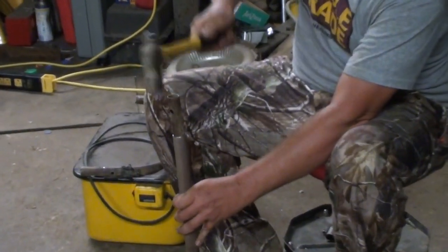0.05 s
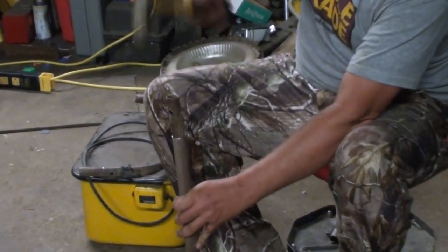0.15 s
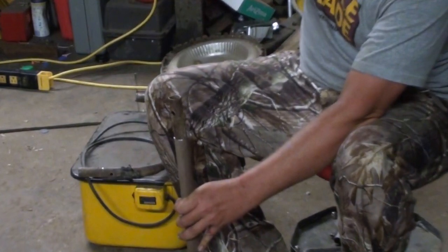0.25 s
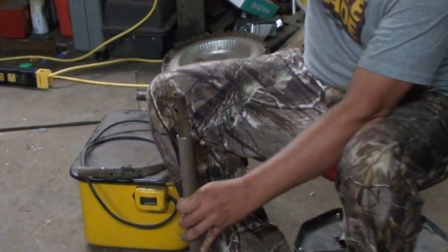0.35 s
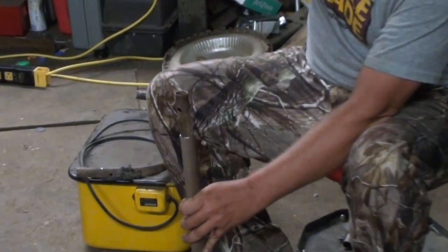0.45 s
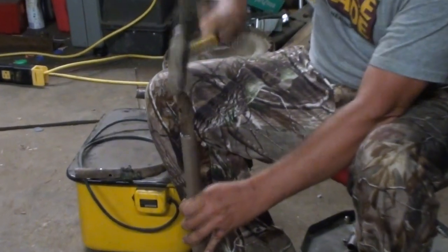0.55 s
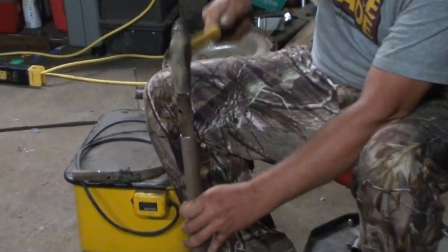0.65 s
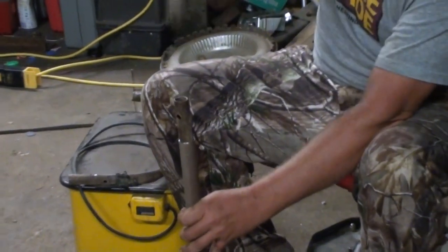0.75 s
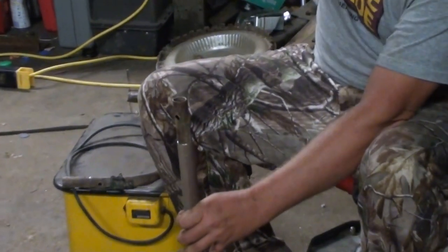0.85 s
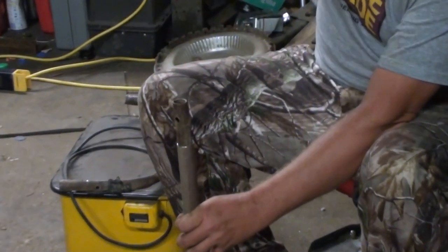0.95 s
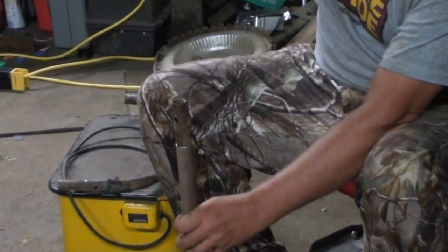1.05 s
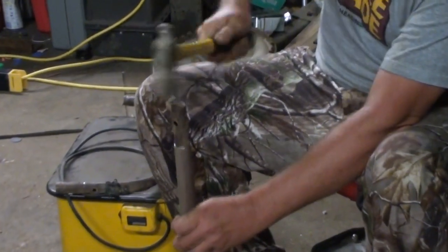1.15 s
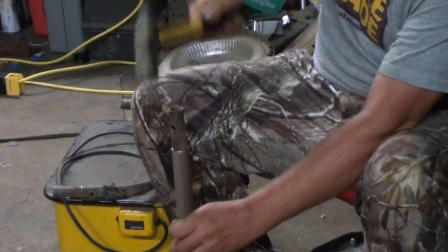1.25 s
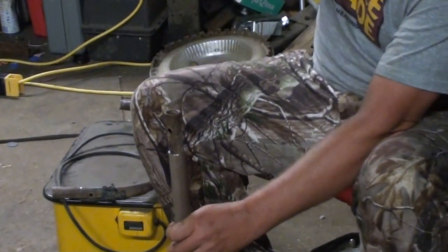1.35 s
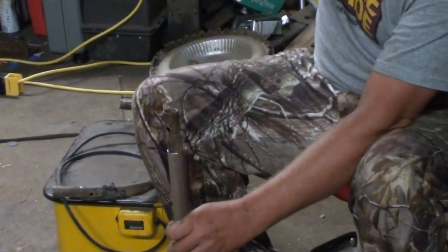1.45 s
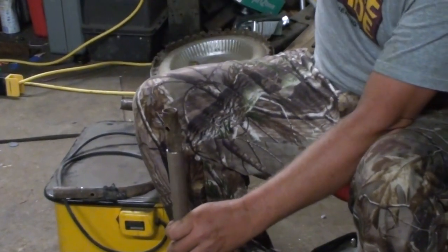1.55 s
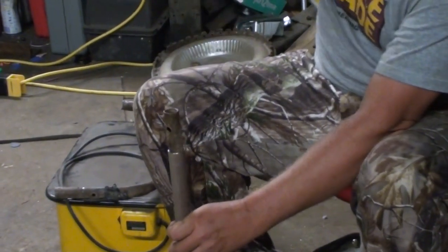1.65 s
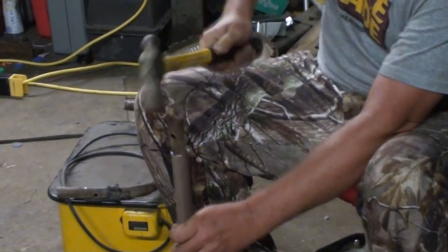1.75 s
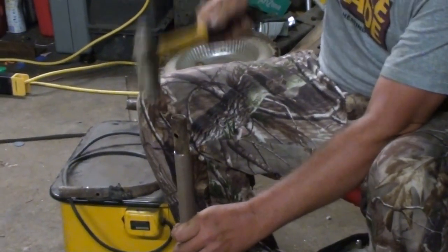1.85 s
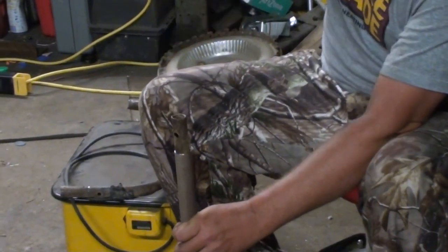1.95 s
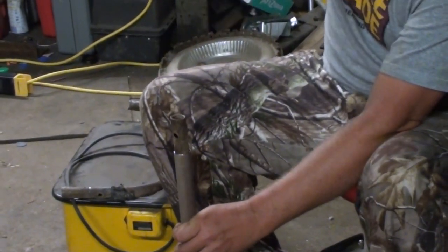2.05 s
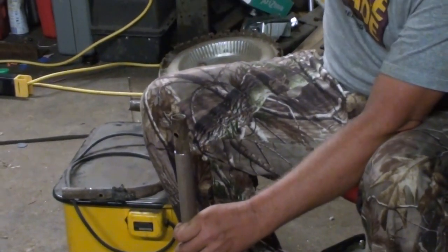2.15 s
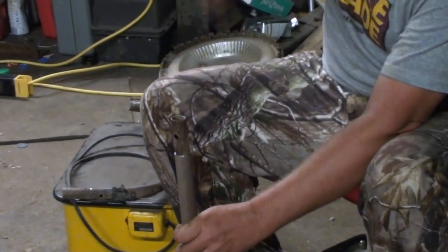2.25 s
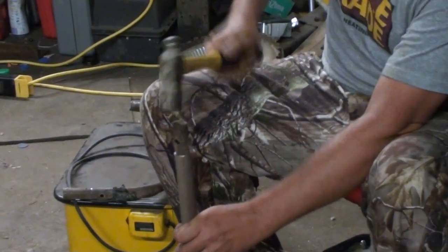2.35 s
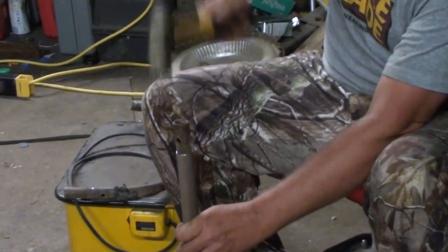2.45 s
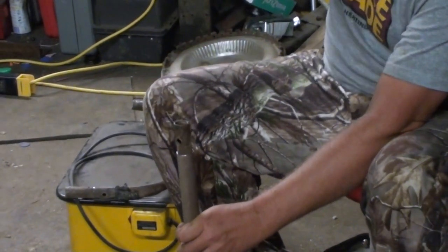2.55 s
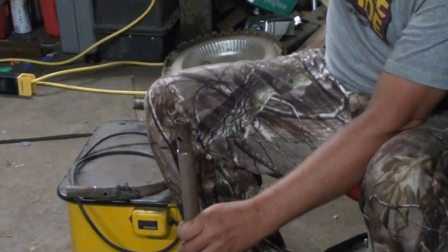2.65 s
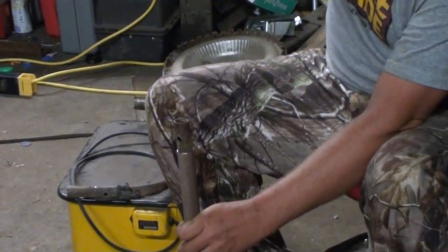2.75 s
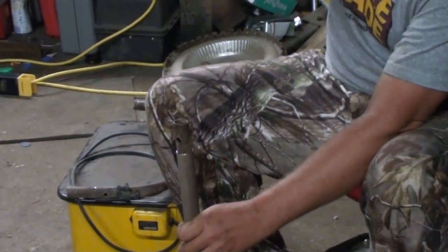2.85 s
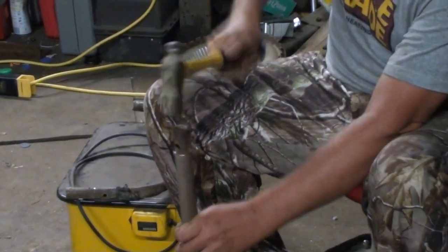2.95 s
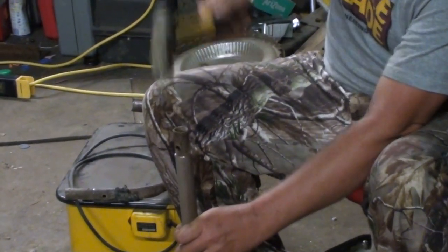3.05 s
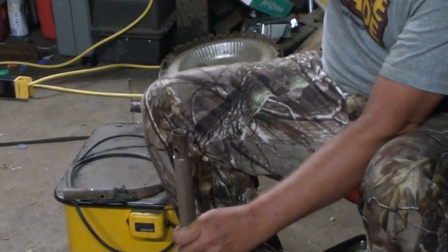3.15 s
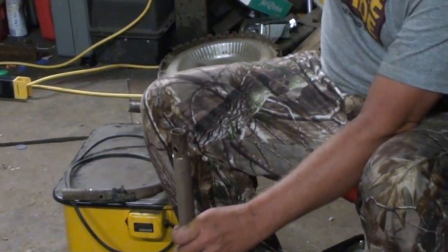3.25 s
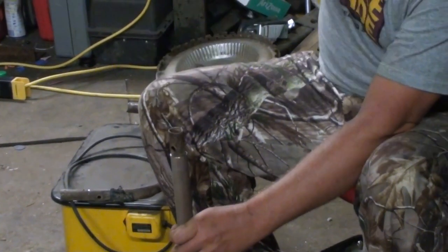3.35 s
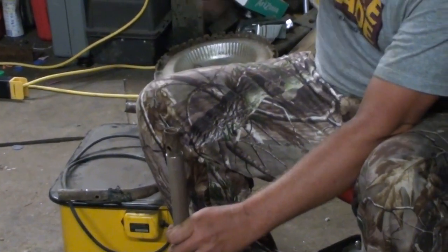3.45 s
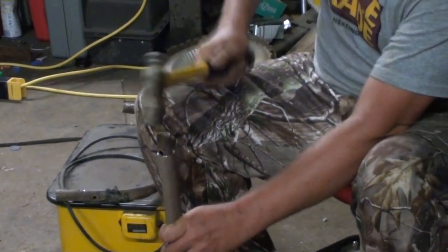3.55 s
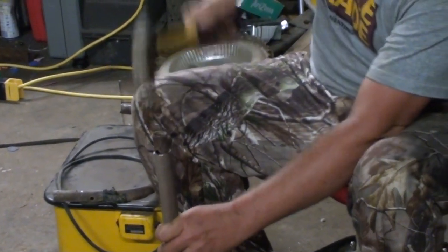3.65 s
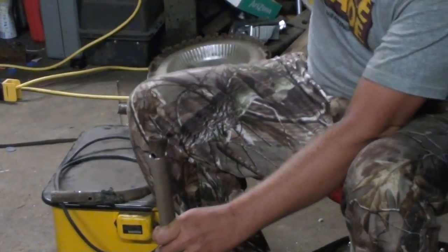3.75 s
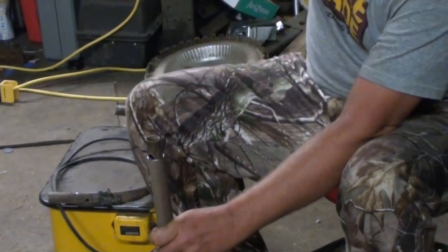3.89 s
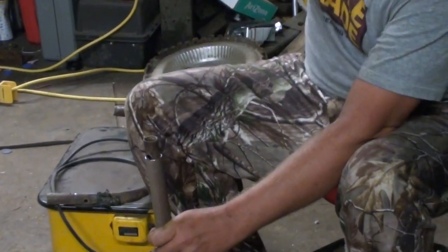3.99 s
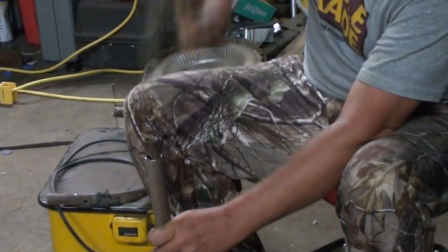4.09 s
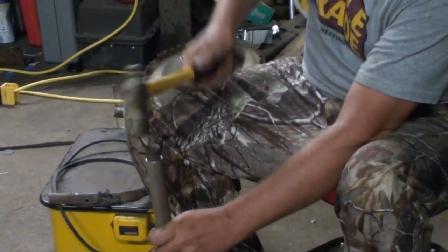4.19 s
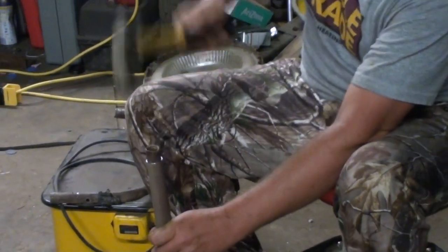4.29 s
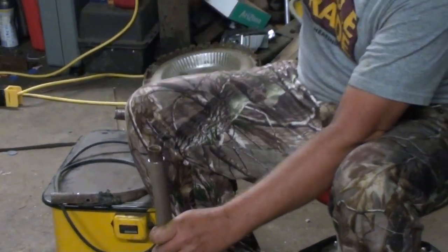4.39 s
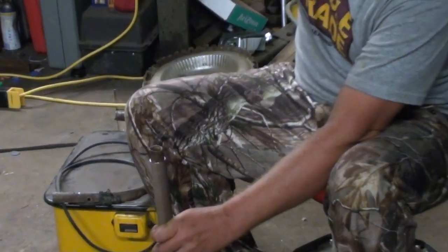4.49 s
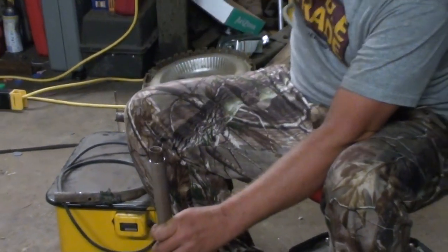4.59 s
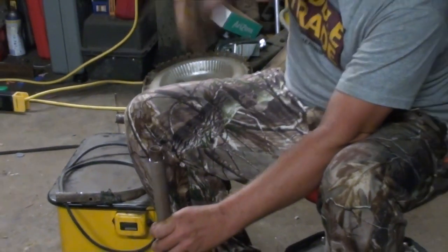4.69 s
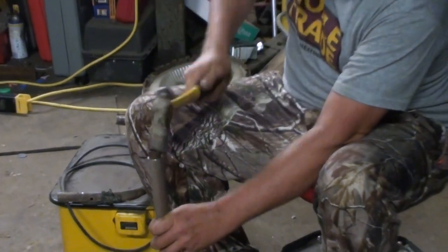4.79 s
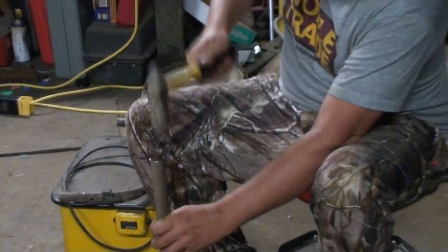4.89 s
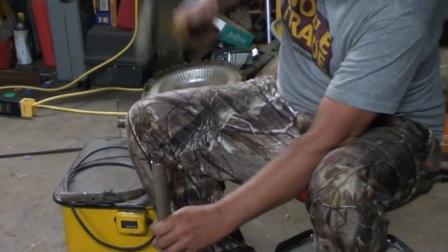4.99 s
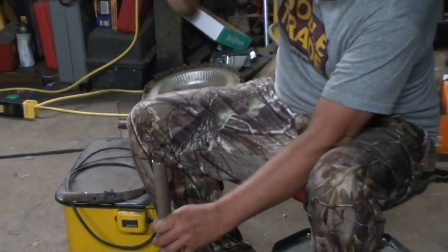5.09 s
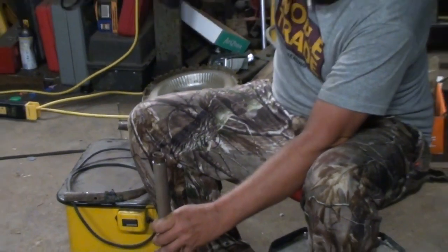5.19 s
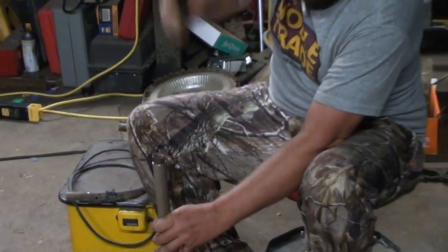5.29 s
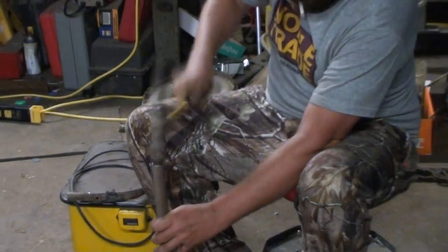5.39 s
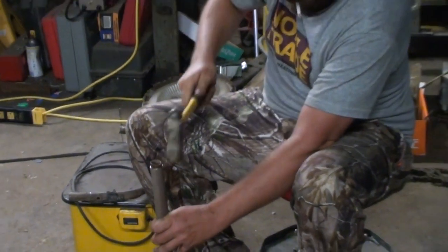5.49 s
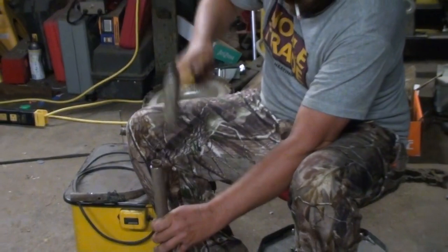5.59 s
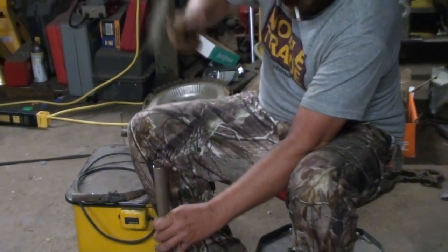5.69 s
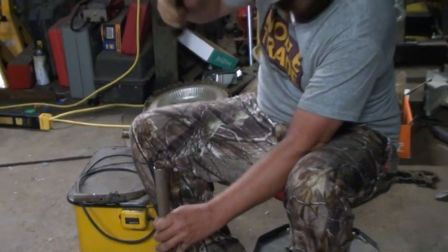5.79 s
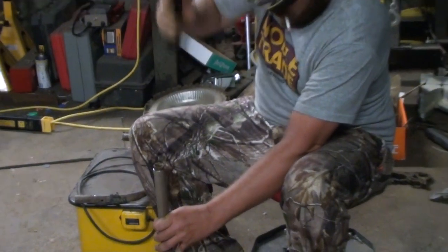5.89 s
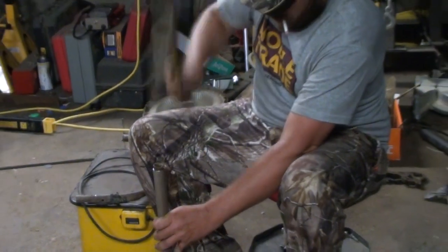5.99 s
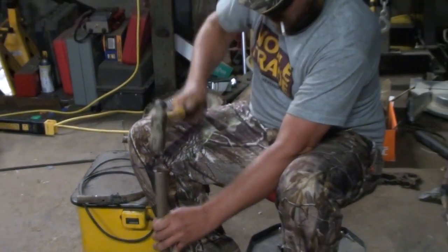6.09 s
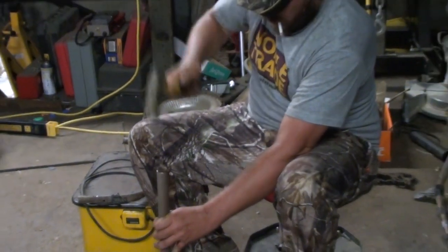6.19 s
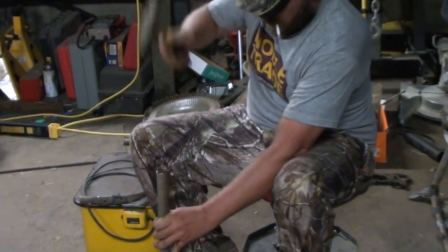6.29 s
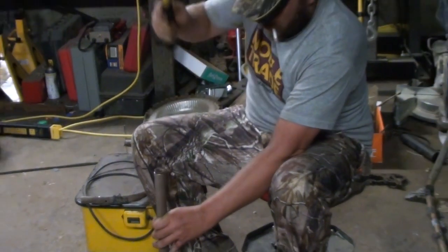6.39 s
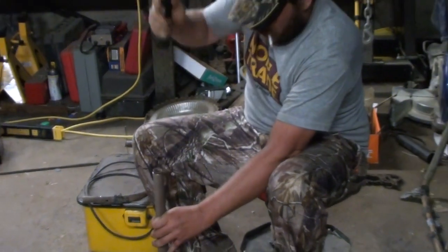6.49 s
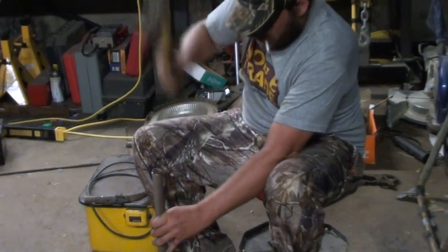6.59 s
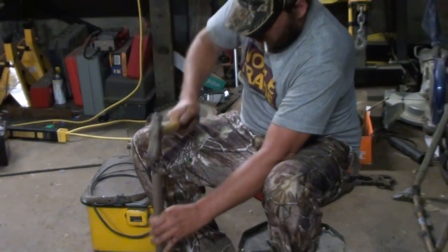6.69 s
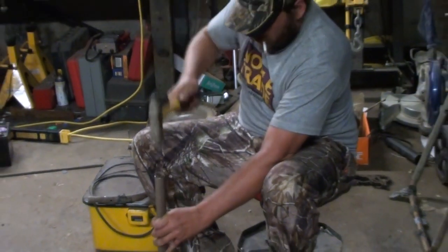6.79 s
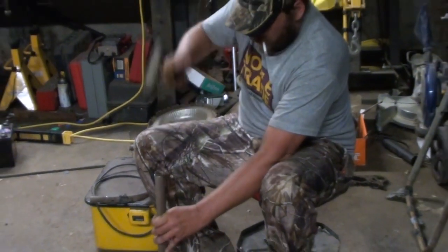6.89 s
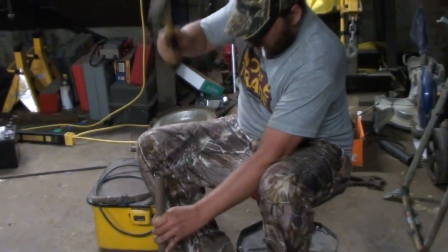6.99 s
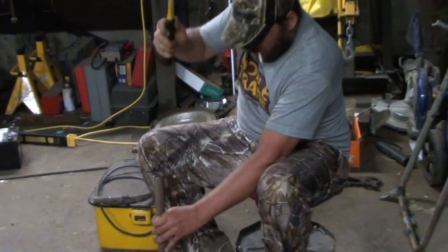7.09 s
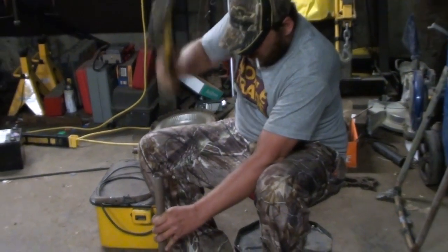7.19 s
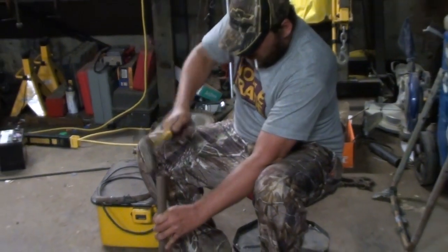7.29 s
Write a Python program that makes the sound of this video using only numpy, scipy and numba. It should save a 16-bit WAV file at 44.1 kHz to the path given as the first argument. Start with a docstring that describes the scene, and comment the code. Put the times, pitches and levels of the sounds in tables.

```python
"""Hard, short clanks come first: a hammer strikes a hand-held upright steel tube at a steady pace in a garage.
Each blow is a dense burst of resonances with rebounds a millisecond or two apart and a few thin modes ringing on;
the spot struck shifts its colour. Echoes and a stereo tail of about a second make the hard-walled room.
At the camera microphone, shaped noise gives handling rumble and still air, and wavering sines a faint hum.
A limiter flattens the start of each blow and its tail, then peaks are rounded and the top is cut."""
import sys
import numpy as np
from scipy import signal
from scipy.fft import rfft, irfft
from scipy.io import wavfile
from numba import njit

SR = 44100
rng = np.random.default_rng(int(sys.argv[2]) if len(sys.argv) > 2 else 0)


def digitize_waveform(pressure):
    """Quantize a signal to 16-bit integers and store it at the path in sys.argv[1].

    Rows of a 2-D input are taken as channels; values are limited to [-1, 1].
    """
    field = np.atleast_2d(pressure).T
    bounded = np.clip(field, -1, 1)
    quanta = np.round(bounded * 32767).astype(np.int16)
    wavfile.write(sys.argv[1], SR, quanta)


N = 323587

# blows on the tube; the spot struck favours two of its resonances (the first blow falls before the start):
# [t/s, relative force level/dB, brightness/(dB per octave), rebound delay/ms, rebound share/(0-1),
#  lower resonance f/Hz, upper resonance f/Hz, lift level of both/dB, thud lift level/dB,
#  lasting ring level re the crack/dB]
BLOWS = [ (-.53, 1.5, .7, 1.2, .2, 2300, 6400, 5, 2, -28),
         (0.066, 1, 0.35, 0.9, 0.23, 1900, 3160, 5.5, -5, -30),
         (.648, 1.65, 0, 0.94, 0.1, 2420, 3430, 5.5, -8.5, -20),
         (1.2219, -2, .5, 1.73, 0.22, 1850, 5930, 3.5, 2.5, -41),
         (1.814, -0.4, 0.45, 1.73, 0.13, 2800, 6980, 7, -0.5, -35),
         (2.4068, 0.1, .4, 0.51, 0.25, 5774, 7500, 3, -2, -27),
         (3.0062, 2.34, .5, 1.4, 0.2, 1530, 6860, 1.5, -5, -29),
         (3.6126, 2, 0.06, 2.17, 0.33, 3310, 9100, 5.5, -8, -42),
         (4.2134, -2, 1.44, 1.18, 0.2, 790, 7700, 5, 8, -29),
         (4.8458, 0, -0.94, 1.17, 0.34, 1000, 5070, 1.5, -7.5, -39),
         (5.4959, 1.4, -.2, 1.39, .3, 780, 2000, 3.5, -2, -14),
         (6.1328, 1.5, 0.43, 1.13, 0.3, 2000, 2820, 5, 7.5, -36),
         (6.7641, 0.5, -1.14, 1.31, 0.14, 980, 2510, 5.5, 4.5, -40)]
# colour of the clank common to all blows: [f/Hz, level/dB]
CLANK_COLOUR = [(30, -35), (60, -43), (140, -12), (300, -11.5), (440, -9.5), (590, -19), (950, -7),
                (1250, -4.5), (1800, -1.5), (2600, -2.5), (3800, -5), (6500, -0.5), (8800, -7),
                (10800, -18.5), (15500, -28)]
# thin lasting modes of the tube, mostly one close cluster: [f/Hz, relative level/dB, t60/s]
TUBE_MODES = [(4322, -3, .6), (4389, 0, .95), (4425, -1, .75), (4490, -3, .6), (5262, -4, .5)]
# reverberation time of the garage: [f/Hz, t60/s]
GARAGE_T60 = [(200, 0.64), (530, 0.89), (1400, 1.025), (2600, 1.06), (4000, 0.97), (6500, 0.84),
              (9700, 0.58), (14000, 0.29)]
# stereo width of the reverberation: [f/Hz, side minus mid level/dB]
TAIL_WIDTH = [(150, -48), (600, -19.5), (1400, -16), (2800, -13), (5600, -10), (9000, -13.5), (12000, -89)]
# first echoes off floor, bench and walls: [delay t/s, level re the direct sound/dB]
ECHOES = [(.0032, -5), (0.0186, -2), (.0205, -28), (0.026, -1.5)]
# rumble colour of the camera body: [f/Hz, relative level/dB]
RUMBLE_COLOUR = [(20, -28), (38, -14), (60, -1.5), (130, 2), (190, -4.5), (280, -6.5), (500, -24),
                 (1500, -61)]
# stereo width of the rumble: [f/Hz, side minus mid level/dB]
RUMBLE_WIDTH = [(30, -25), (130, -7)]
# shifts of the hand on the camera, short bumps to longer rubs, before the handling trim:
# [peak t/s, level/dB, dying time constant t/s]
GRIP_SHIFTS = [(0, -40, 0.032), (.545, -40, 0.029), (2.885, -34, 0.029), (2.955, -36.5, 0.014),
               (3.31, -40, 0.073), (3.788, -34, 0.15), (4.12, -52, 0.037), (4.43, -35, .1),
               (4.783, -29, 0.021), (5.345, -40, 0.033), (5.47, -48, 0.067), (5.82, -41, 0.037),
               (6.26, -34, 0.087)]
# tremor of the hand, firmer once the camera starts to move, before the handling trim: [t/s, level/dB]
TREMOR = [(2.2, -78), (2.7, -47), (5.6, -52.5), (7.3, -52)]
# colour of the still air in the garage: [f/Hz, relative level/dB]
AIR_COLOUR = [(25, -28), (120, -6), (240, 0), (450, 1), (600, -5.5), (1000, 1), (3000, -11), (7000, -27),
              (11000, -27), (15500, -32)]
# faint hum of a machine, about which each level wavers: [f/Hz, rms level/dB]
HUM = [(120, -68.5), (225, -61), (403.5, -68), (846, -64.5)]

TIME = np.arange(N) / SR  # s
REBOUND_HZ = 5370  # a rebound is a softer contact, dull above this
THUD_HZ, THUD_WIDTH_HZ = 193, 165  # the floor under the tube answers with a thud
GRIP_RISE = 0.57  # rise time of a grip shift as a share of its dying time
TOP_HZ = 16000  # upper limit of the sound after the limiter


def undb(db):
    """Turn a level in dB into an amplitude factor."""
    return 10 ** (np.asarray(db) / 20)


def unit(x):
    """Scale to an rms of one."""
    return x / np.sqrt(np.mean(x ** 2))


def lookup(points, hz):
    """Join (f/Hz, value) points by straight lines on a log-frequency axis."""
    f, value = np.transpose(points)
    return np.interp(np.log(np.maximum(hz, 1)), np.log(f), value)


def bins(size):
    """Frequencies in Hz of the spectrum of a sound of this many samples."""
    return np.fft.rfftfreq(size, 1 / SR)


def noise(colour):
    """Noise of unit rms whose spectrum follows (f/Hz, level/dB) points."""
    spectrum = rfft(rng.standard_normal(N))
    return unit(irfft(spectrum * undb(lookup(colour, bins(N))), N))


def wander(size, step):
    """A random line joining normal draws of spread one, one every step points."""
    knots = rng.standard_normal(size // step + 2)
    return np.interp(np.arange(size) / step, np.arange(len(knots)), knots)


def causal(db):
    """Spectrum of the promptest (minimum-phase) response with this gain curve."""
    cepstrum = irfft(np.log(undb(db)))
    half = len(cepstrum) // 2
    # fold the part before time zero onto the part after it
    cepstrum[1:half] *= 2
    cepstrum[half + 1:] = 0
    return np.exp(rfft(cepstrum))


def stereo(mid, side):
    """Left and right from mid and side."""
    return np.array([mid + side, mid - side])


def add(out, sound, s):
    """Mix a stereo sound in from time s on, cropped to the length of the scene."""
    start = int(s * SR)
    a, b = max(start, 0), min(start + sound.shape[1], N)
    out[:, a:b] += sound[:, a - start:b - start]


def peak_shape(hz, centre_hz, width_hz):
    """A resonance-shaped hump of height one."""
    return 1 / (1 + ((hz - centre_hz) / width_hz) ** 2)


def tube_ring(t):
    """Thin modes of the tube, slightly detuned on each blow, each dying at its own rate."""
    ring = 0
    for mode_hz, mode_db, t60 in TUBE_MODES:
        detune = 1 + 0.002 * rng.standard_normal()
        decay = np.exp(-np.log(1000) * t / t60)
        ring = ring + undb(mode_db) * np.sin(2 * np.pi * mode_hz * detune * t) * decay
    return unit(ring)


def clank(tilt_db, rebound_ms, rebound_share, favoured_hz, lift_db, thud_db, ring_db,
          width_hz=100, width_share=0.089, scatter_s=.003, size=32768):
    """One blow and its rebounds: a short crack of crowded resonances, with thin modes ringing on."""
    hz, t = bins(size), np.arange(size) / SR
    db = lookup(CLANK_COLOUR, hz) + tilt_db * np.log2(np.maximum(hz, 120) / 3500)
    db = db + thud_db * peak_shape(hz, THUD_HZ, THUD_WIDTH_HZ)
    for centre_hz in favoured_hz:
        db = db + lift_db * peak_shape(hz, centre_hz, width_hz + width_share * centre_hz)
    # above the first bending modes the wall rings with many close partials, some louder on each blow
    db = db + np.minimum(hz / 1600, 1) * 1.9 * wander(len(hz), step=45)
    # the face chatters on the rim: each landing is a softer share of the one before
    late = np.exp(-2j * np.pi * hz * rebound_ms / 1000)
    softer = np.clip(rebound_share, 0, .7) / (1 + (hz / REBOUND_HZ) ** 2)
    contact = 1 / (1 - softer * late)
    # bending waves run up and down the tube, so each frequency leaves with its own delay
    delay_s = scatter_s * (0.2916 + np.abs(wander(len(hz), step=150)))
    dispersion = np.exp(-2j * np.pi * np.cumsum(delay_s) * hz[1])
    crack = irfft(contact * causal(db) * dispersion)
    return crack + undb(ring_db) * tube_ring(t) * np.std(crack)


def reverberation(build_s=0.018, size=49152):
    """A dense stereo tail of unit energy per channel that builds up quickly; each band has its own decay."""
    t, hz = np.arange(size) / SR, bins(size)
    centres = np.geomspace(125, 16000, 11)  # Hz
    mid, side = rfft(rng.standard_normal((2, size)))
    diffuse = stereo(mid, side * undb(lookup(TAIL_WIDTH, hz)))
    tail = 0
    # overlapping bands that sum to the whole spectrum
    for centre, share in zip(centres, np.eye(len(centres))):
        band = irfft(diffuse * lookup(np.c_[centres, share], hz))
        tail = tail + band * np.exp(-np.log(1000) * t / lookup(GARAGE_T60, centre))
    build_up = 1 - np.exp(-t / build_s)
    return unit(tail * build_up) / np.sqrt(size)


def garage(steady, tail_db=13):
    """Direct sound, hard echoes and the tail, part of which changes as the camera and the arm move."""
    response = undb(tail_db) * (steady + reverberation()) / np.sqrt(2)
    response[:, 0] += 1  # direct sound
    for delay_s, db in ECHOES:
        response[:, int(delay_s * SR)] += undb(db)
    return response


def hammering(blow_db=17):
    """Each clank is convolved with the response of the garage and placed at its time."""
    out, steady = np.zeros((2, N)), reverberation()
    for (s, force_db, tilt_db, rebound_ms, rebound_share,
         lower_hz, upper_hz, lift_db, thud_db, ring_db) in BLOWS:
        blow = clank(tilt_db, rebound_ms, rebound_share, (lower_hz, upper_hz), lift_db, thud_db, ring_db)
        in_room = signal.fftconvolve(blow[None], garage(steady), axes=1)
        add(out, undb(blow_db + force_db) * in_room, s)
    return out


def handling(trim_db=-1):
    """The hand on the camera: a dull tremor, and shifts of the grip that swell quickly and die away."""
    strength = undb(np.interp(TIME, *np.transpose(TREMOR)))
    for s, db, dying_s in GRIP_SHIFTS:
        age = (TIME - s) / dying_s  # negative while the shift swells
        strength = strength + undb(db) * np.exp(-np.maximum(age, -age / GRIP_RISE))
    width = undb(lookup(RUMBLE_WIDTH, bins(N)))
    side = irfft(rfft(noise(RUMBLE_COLOUR)) * width, N)
    return undb(trim_db) * strength * stereo(noise(RUMBLE_COLOUR), side)


def machine_hum(waver_db=2):
    """Sines whose level and phase wander, alike in both channels."""
    hum = 0
    for f, db in HUM:
        level = np.sqrt(2) * undb(db + waver_db * wander(N, step=6000))  # rms to peak
        hum = hum + level * np.sin(2 * np.pi * f * TIME + wander(N, step=5000))
    return hum


def background(air_db=-49, side_db=-14):
    """Still air as shaped stereo noise, with the machine hum in the middle."""
    air = stereo(noise(AIR_COLOUR), undb(side_db) * noise(AIR_COLOUR))
    return machine_hum() + undb(air_db) * air


def scene(left_db=0.3):
    """Blows, handling and background at the microphone, a touch stronger on the left."""
    balance = undb([[left_db / 2], [-left_db / 2]])
    return (hammering() + handling() + background()) * balance


@njit
def follow(x, attack, release):
    """Envelope that rises fast and sinks slowly."""
    out, e = np.empty(len(x)), 0.
    for i in range(len(x)):
        e += (x[i] - e) * (attack if x[i] > e else release)
        out[i] = e
    return out


def record(dry, ceiling_db=-7.0, attack_s=0.000067, release_s=0.017, clip_db=-2):
    """The camera's limiter holds loud sound at its ceiling; peaks are rounded and the top is cut."""
    attack, release = 1 - np.exp(-1 / (attack_s * SR)), 1 - np.exp(-1 / (release_s * SR))
    envelope = follow(np.abs(dry).max(axis=0), attack, release)
    held = dry / np.maximum(envelope / undb(ceiling_db), 1)
    rounded = undb(clip_db) * np.tanh(held / undb(clip_db))
    # steep low-pass: 0.2 dB ripple below the limit, 80 dB down above it
    top_cut = signal.ellip(10, .2, 80, TOP_HZ, fs=SR, output="sos")
    return signal.sosfilt(top_cut, rounded)


dry = scene()
out = record(dry)
digitize_waveform(out)
```